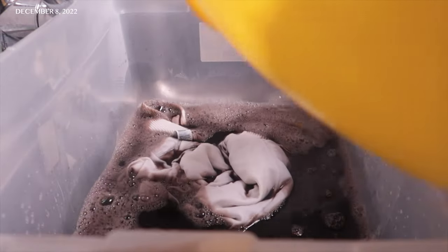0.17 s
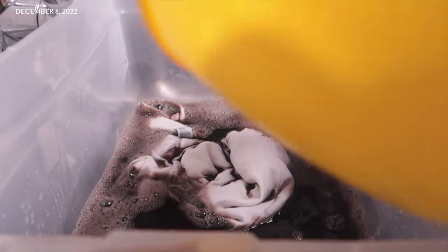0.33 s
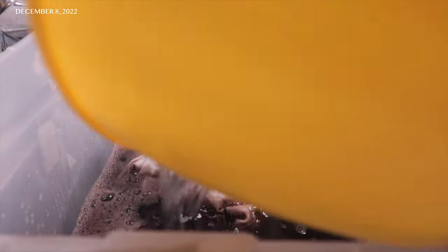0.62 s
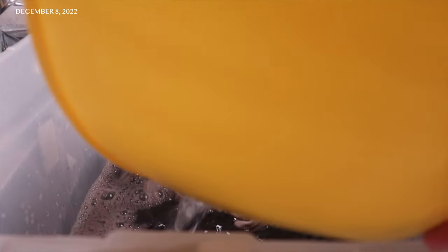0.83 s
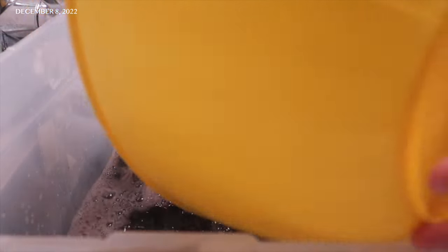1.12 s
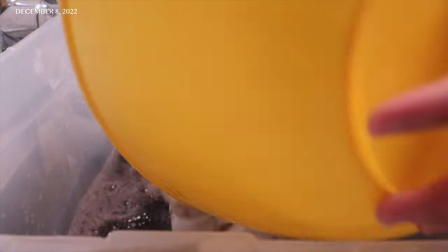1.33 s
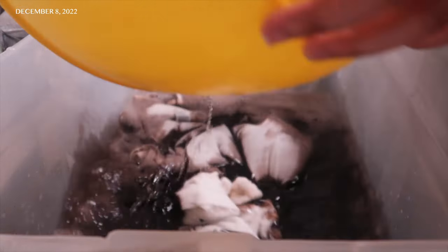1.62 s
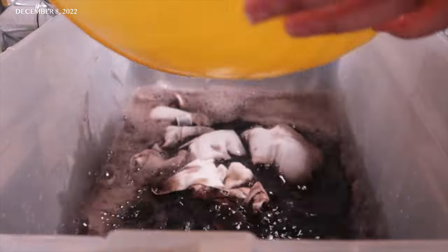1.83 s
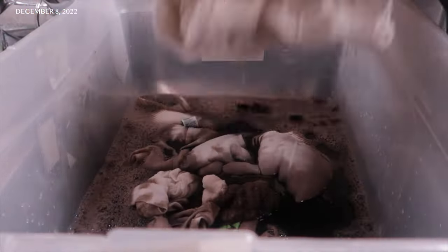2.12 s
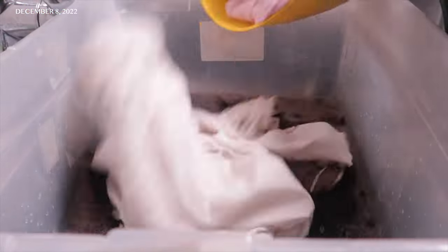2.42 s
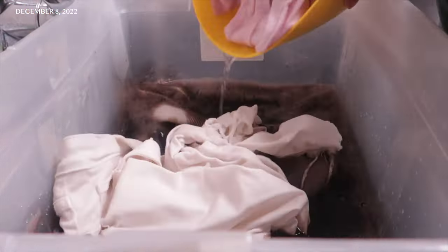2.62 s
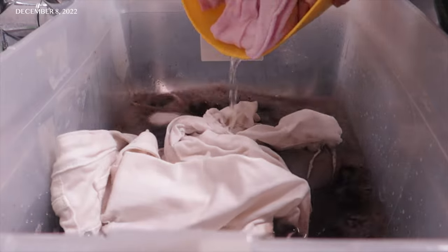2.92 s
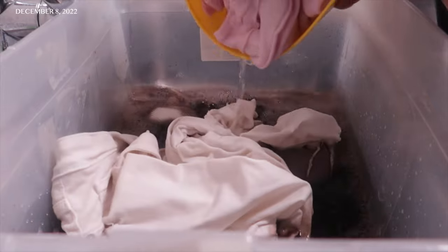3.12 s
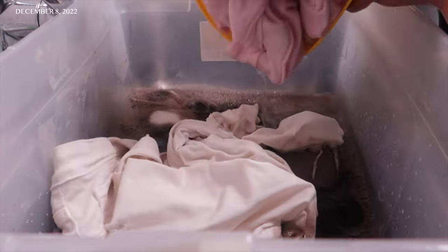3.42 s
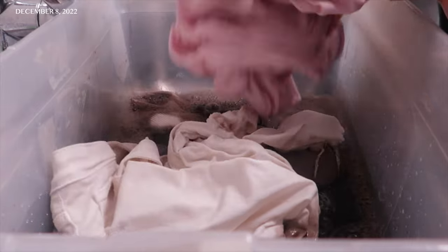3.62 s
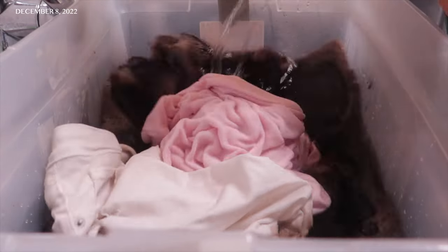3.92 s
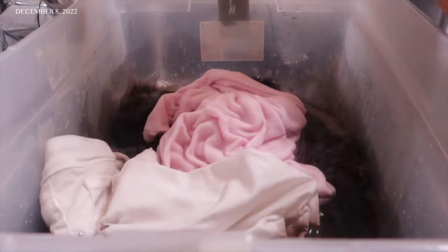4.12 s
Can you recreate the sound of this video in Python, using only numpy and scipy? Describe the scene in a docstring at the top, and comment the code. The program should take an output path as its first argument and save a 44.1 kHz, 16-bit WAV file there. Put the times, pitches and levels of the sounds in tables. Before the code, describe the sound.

Close, slightly wide stereo in a small, quiet room with faint rumble and hiss. A brief wet cloth scrape opens, and at 0.14 s a sharp hollow knock sounds as a basin hits a plastic tub. From about 0.55 s water gushes in, strongest around 0.7 to 1.0 s, with gurgling bubbles, crisp spatter and a low boom from the tub, thinning by 1.35 s. Wet flicks and surges at 1.4 to 1.5 s lead into the first load of cloth, a sharp splashing slap at 1.6 s. The basin clacks at 1.78 s, lighter at 1.88 s. After near quiet, a heavier load plunges at 2.42 s with a deep, dull gulp and thud. Soft drips and plops trickle from 2.6 to 3.4 s, then cloth slides faintly. At 3.83 s the third load smacks in loudly, and water heaves back brightly at 4.0 s, ending in small slaps and drips.

```python
"""A brief scrape of wet cloth over a basin's rim, then a sharp knock as the basin meets a plastic tub of dye water.
Water pours in, and three loads of cloth slide off and slap in, one after another, close to the listener.
Bubbles ring as masses on springs of trapped air, flung drops patter, torn water hisses and wet folds snap.
The water surges and sloshes back, stray drops fall, and struck plastic sounds its modes.
The hollow tub colours the water by resonance; a small room and its faint rumble and hiss lie around it."""
import sys
import numpy as np
from scipy import signal
from scipy.fft import rfft, irfft, next_fast_len
from scipy.io import wavfile
from scipy.ndimage import uniform_filter1d

SR = 44100
rng = np.random.default_rng(int(sys.argv[2]) if len(sys.argv) > 2 else 0)


def log_audio(samples):
    """Write samples as a 16-bit WAV file to the path given in sys.argv[1]."""
    # one column per channel
    frames = np.atleast_2d(samples).T
    # limit to full scale, then quantise
    limited = np.clip(frames, -1, 1)
    pcm = np.round(limited * 32767).astype(np.int16)
    wavfile.write(sys.argv[1], SR, pcm)


N = 188130
TIME = np.arange(N) / SR
PADDED = next_fast_len(N + 4096)
HZ = np.fft.rfftfreq(PADDED, 1 / SR)
# The stream from the basin's lip. Each row: time in seconds, strength in dB before it is shared among bubble sizes.
POUR_STRENGTH = [(0.53, -60), (0.59, -33.5), (0.70, -40), (0.83, -31.5), (0.9, -28.5), (0.98, -32),
                 (1.12, -40), (1.25, -43.5), (1.39, -55)]


def amp(db):
    """Level: decibels become an amplitude ratio."""
    return 10 ** (np.asarray(db) / 20)


def unit(x):
    """Normalization: a signal is scaled to rms 1."""
    return x / np.sqrt(np.mean(x ** 2) + 1e-20)


def read(points, hz):
    """Interpolation: a curve over frequency is read on a logarithmic frequency axis."""
    f, value = np.transpose(points)
    return np.interp(np.log(hz + 1), np.log(f), value)


def shaped(x, gain):
    """Linear filtering: each frequency is multiplied by its own gain."""
    return irfft(rfft(x, PADDED) * gain, PADDED)[:N]


def add(mix, s, sound):
    """Superposition: a sound is mixed in at time s."""
    part = mix[max(round(s * SR), 0):][:len(sound)]
    part += sound[:len(part)]


def water(hiss_db=-10):
    """Bubble resonance: swarms of four sizes ring over the hiss of torn water and sliding cloth, in the hollow tub."""
    # Crossovers between neighbouring bubble sizes, in Hz.
    crossovers = [700, 2500, 8200]
    # Spectrum of the water. Each row: frequency in Hz, relative level in dB per Hz.
    spectrum = [(30, 8), (70, -1.5), (120, 3), (200, -7.5), (370, -4), (550, -2.5), (780, -6), (1150, -9.5),
                (2000, -10.5), (3500, -16), (6500, -25), (8900, -44), (12800, -41), (15000, -65)]
    # Resonances of the air in the tub. Each row: frequency in Hz, width in Hz, boost in dB.
    hollow = [(148, 18, 6), (282, 58, 8.5), (480, 34, 6.5), (917, 21, 5), (1090, 47, 7), (1200, 240, 6.5),
              (1430, 36, 0), (1630, 68, 4), (2116, 32, 10), (2270, 24, 8), (2650, 45, 3), (2870, 50, -0.5)]
    boost = sum(db / (1 + (2 * (HZ - hz) / width) ** 2) for hz, width, db in hollow)
    colour = amp(read(spectrum, HZ) + boost)
    swarms = [froth(121.3, 737.0, per_s=380, spread_db=2.5, cycles=57.4),
              froth(642.6, 2749, per_s=1150, spread_db=3.0, cycles=90.0),
              froth(2297, 8460, per_s=2300, spread_db=1.5, cycles=71),
              froth(6340, 16060, per_s=3300, spread_db=-2.5, cycles=102)]
    below = [0] + [1 / (1 + (HZ / hz) ** 8) for hz in crossovers] + [1]
    moment = signal.windows.hann(SR // 25)
    out = np.zeros(N)
    for k, (swarm, strength) in enumerate(zip(swarms, stirring())):
        band = np.sqrt(np.maximum(below[k + 1] - below[k], 0))
        sound = swarm + amp(hiss_db) * rng.standard_normal(N)
        if k > 0:  # the deep gulps do not clump
            sound = clumped(sound)
        sound = unit(shaped(sound, colour * band))
        # the bubbles of one moment share the energy that the water has then
        shared = signal.oaconvolve(sound ** 2, moment / moment.sum(), "same")
        out += strength * sound / np.sqrt(abs(shared) + 0.27)
    return out


def stirring():
    """Energy sharing: powers of pour, loads, surges, sliding cloth and lapping add up for each size of bubble."""
    # Shares of each motion, in dB for deep gulps, splash, spatter and finest mist.
    pour_mix, load_mix = (-2.5, 0.5, -7, -22.5), (-2.5, 0, -6, -11.5)
    surge_mix, slide_mix = (3, 0.5, -7.5, -18.5), (-40, -10, 3.5, -4.5)
    # The stirred tub never comes quite to rest: strength in dB for the same four sizes.
    lapping = (-56, -60, -64.5, -68.5)
    # The dB that each size gains for one dB of brightness.
    brightens = (-0.26, 1.02, 2.5, 3)
    # Loads of wet cloth land. Each row: time in seconds, splash in dB, depth of the gulp in dB, spray in dB.
    loads = [(1.602, -23, 3, 2), (2.424, -30, 9, 3), (3.836, -22.5, 6, -0.5)]
    # Every landing is a sharp loud slap, within a softer, slower swell and a faint lingering slosh, all
    # peaking together. Each: level in dB, time constants of power for rise and fall in seconds.
    slap, slow_swell, slosh = (0, 0.0086, .014), (-11, 0.043, 0.029), (-21, .04, 0.099)
    # Water heaves and breaks against cloth and walls. Each row: peak in seconds,
    # time constants of rise and fall in seconds, level in dB, brightness in dB.
    surges = [(0.265, 0.0059, 0.015, -51.5, -0.5), (0.623, 0.0094, 0.03, -39.5, 5),
              (0.683, 0.0042, 0.026, -30.5, 3.5), (0.772, 0.018, 0.02, -28, -3.5),
              (0.864, 0.0056, 0.011, -32, 2.5), (0.94, 0.015, 0.053, -42, 8),
              (1.07, 0.0036, 0.012, -36.5, 3), (1.208, 0.0094, 0.01, -37, 0),
              (1.286, 0.016, 0.014, -42.5, 4), (1.401, 0.0045, 0.051, -37.5, 5),
              (1.437, 0.0033, 0.0072, -31.5, -1), (1.469, 0.023, 0.021, -36.5, 3),
              (1.512, 0.013, 0.014, -32, 2), (1.689, 0.01, 0.012, -41, 5), (1.88, 0.032, 0.023, -47.5, -1),
              (2.32, 0.0025, 0.034, -41.5, -4.5), (2.365, 0.005, 0.007, -37, 2.5),
              (2.405, 0.0078, 0.0046, -31.5, -8), (2.462, 0.02, 0.038, -31.5, -7),
              (2.522, 0.0025, 0.033, -38, 1), (3.888, 0.032, 0.014, -33.5, 1.5),
              (3.942, 0.011, 0.0073, -36, -2), (3.97, 0.0018, 0.0056, -30.5, 0.5),
              (4.005, 0.011, 0.021, -27, 2), (4.124, 0.0011, 0.0084, -41, 0.5),
              (4.131, 0.13, 0.022, -44.5, 0.5)]
    # Wet cloth drags over the basin's rim. Each row: peak in seconds, time constants of rise and fall
    # in seconds, level in dB.
    slides = [(0.002, 0.0035, 0.0082, -37), (0.54, 0.0012, 0.13, -46), (2.23, 0.027, 0.008, -52.5),
              (3.56, 0.091, 0.12, -53.5)]
    gulp_lag_s = 0.062  # the stream has to dig a hole before it traps large pockets of air
    streams = np.array([pouring(gulp_lag_s)] + [pouring(0)] * 3)
    power = amp(pour_mix)[:, None] ** 2 * streams
    power += np.outer(amp(lapping) ** 2, TIME > POUR_STRENGTH[0][0])
    for s, db, depth_db, spray_db in loads:
        parts = (slap, slow_swell, slosh)
        landing = sum(amp(part_db) ** 2 * swell(s, rise, fall) for part_db, rise, fall in parts)
        levels = db + np.add(load_mix, [depth_db, 0, spray_db, spray_db])
        power += np.outer(amp(levels) ** 2, landing)
    for s, rise, fall, db, bright_db in surges:
        levels = db + np.array(surge_mix) + bright_db * np.array(brightens)
        power += np.outer(amp(levels) ** 2, swell(s, rise, fall))
    for s, rise, fall, db in slides:
        power += np.outer(amp(db + np.array(slide_mix)) ** 2, swell(s, rise, fall))
    return np.sqrt(power)


def pouring(delay_s):
    """Delayed excitation: the power of the stream is felt after a lag."""
    db = np.interp(TIME - delay_s, *np.transpose(POUR_STRENGTH), left=-100, right=-100)
    return amp(db) ** 2


def swell(peak_s, rise_s, fall_s):
    """Exponential growth and decay: power builds up to a peak and dies away."""
    return np.exp(-np.maximum((peak_s - TIME) / rise_s, (TIME - peak_s) / fall_s))


def froth(lo, hi, per_s, spread_db, cycles, count=90):
    """Random superposition: a steady swarm of bubbles between two pitches, with scattered times and strengths."""
    out = np.zeros(N)
    for hz in np.geomspace(lo, hi, count) * rng.uniform(.98, 1.02, count):
        life, chirp = rng.random(2)
        place, strength = rng.random((2, 200))
        members = int(np.clip(per_s * N / SR / count, 1, len(place)))
        t60 = cycles / np.sqrt(hz * 1000) * (.5 + life)  # small bubbles ring for more cycles
        ring = np.sqrt(hz / t60) * bubble(hz, t60, 0.525 * chirp / t60, 0.43)
        sizes = amp(spread_db * np.minimum(-np.log(strength[:members]), np.pi))
        at = (place[:members, None] * N).astype(int) + np.arange(len(ring))
        out += np.bincount(at.ravel(), np.outer(sizes, ring).ravel(), N)[:N]
    return unit(out)


def bubble(hz, t60, glide, onset_cycles):
    """Volume resonance: a pocket of air closes, rings and goes sharp (glide in octaves per s) near the surface."""
    pinch_s = 0.0003  # the neck takes time to pinch shut, which rounds the start
    t = np.arange(int(t60 * SR) + 8) / SR
    turns = np.cumsum(hz * 2 ** (glide * t)) / SR
    onset = 1 - np.exp(-(turns / (onset_cycles + hz * pinch_s)) ** 2)
    return np.sin(2 * np.pi * turns) * np.exp(-np.log(1000) * t / t60) * onset


def clumped(x, patch_db=2.6, patch_s=0.009, patch_hz=650):
    """Intermittency: spray breaks up in clumps, each loud for a few milliseconds in its own range of pitch."""
    hz, t, z = signal.stft(x, SR, nperseg=256, noverlap=192)
    patches = uniform_filter1d(rng.standard_normal(z.shape), round(patch_hz / hz[1]), axis=0)
    patches = unit(uniform_filter1d(patches, round(patch_s / t[1]), axis=1))
    gain = amp(patch_db * np.clip(patches, -2, 2))
    return signal.istft(z * gain, SR, nperseg=256, noverlap=192)[1][:N]


def plops(onset_cycles=0.69):
    """Volume resonance: large bubbles and drops stand out alone, each a decaying tone that climbs in pitch."""
    # Each row: start in seconds, pitch in Hz, level in dB, t60 in seconds.
    large_bubbles = [(0.192, 1670, -34, 0.03), (0.215, 1690, -34.5, 0.036), (0.406, 338, -33, 0.035),
                     (0.549, 2060, -30.5, 0.06), (0.596, 687, -24.5, 0.041), (0.614, 1236, -33, 0.067),
                     (0.621, 479, -26.5, 0.097), (0.618, 3230, -20, 0.14), (0.69, 1706, -13, 0.034),
                     (0.693, 128, -16, 0.12), (0.702, 279, -18, 0.074), (0.724, 2067, -22, 0.06),
                     (0.758, 1120, -15, 0.037), (0.763, 910, -20.5, 0.063), (0.766, 492, -17.5, 0.058),
                     (0.772, 650, -23, 0.05), (0.778, 1180, -22.5, 0.079), (0.815, 710, -22, 0.048),
                     (0.785, 5090, -33.5, 0.098), (0.841, 1850, -24, 0.047), (0.854, 3080, -23.5, .05),
                     (0.866, 446, -21, 0.069), (0.872, 1060, -28, 0.05), (0.893, 1747, -19, 0.076),
                     (0.909, 1620, -27, .05), (0.964, 544, -21.5, 0.048), (0.989, 1650, -22, 0.048),
                     (1.005, 464, -19.5, 0.076), (1.06, 299, -21, 0.12), (1.14, 1190, -27.5, 0.043),
                     (1.147, 465, -7.5, 0.027), (1.149, 684, -18, 0.025), (1.2, 1140, -28, 0.053),
                     (1.215, 459, -30, 0.1), (1.377, 2120, -28, 0.028), (1.457, 480, -19, 0.048),
                     (1.499, 1304, -24.5, 0.054), (1.574, 284, -19.5, 0.29), (1.603, 928, -11, 0.05),
                     (1.604, 276, -16, 0.04), (1.690, 650, -27.5, 0.053), (1.922, 940, -27, 0.043),
                     (1.943, 1136, -33.5, 0.05), (2.044, 273, -36, 0.16), (2.421, 275, -7.5, 0.069),
                     (2.474, 192, -23, 0.057), (2.452, 296, -18, 0.066), (2.499, 203, -14, 0.042),
                     (2.621, 1500, -32.5, 0.022), (2.623, 320, -39, 0.071), (2.644, 360, -33, 0.067),
                     (2.722, 452, -31.5, 0.058), (2.756, 503, -36.5, 0.06), (2.774, 635, -38, 0.033),
                     (2.822, 322, -38, 0.078), (2.872, 460, -39.5, 0.05), (2.897, 310, -36, 0.072),
                     (3.103, 435, -40, 0.041), (3.126, 565, -35, 0.037), (3.169, 606, -36, 0.047),
                     (3.175, 790, -46, 0.046), (3.201, 443, -43, .05), (3.235, 296, -38, 0.047),
                     (3.367, 1090, -45, .035), (3.650, 130, -33, 0.085), (3.8, 278, -16.5, 0.07),
                     (3.823, 507.5, -12, 0.17), (3.826, 322, -14, .07), (3.97, 276, -15, 0.043),
                     (3.983, 1370, -14, 0.04), (3.997, 1080, -13.5, 0.071), (4.002, 1960, -11.5, 0.031),
                     (4.007, 2280, -16.5, 0.044), (4.011, 610, -14.5, 0.033), (4.017, 318, -14, 0.035),
                     (4.049, 4100, -30, .06), (4.114, 475, -27.5, 0.15), (4.205, 903, -29.5, 0.054),
                     (4.219, 1010, -30, 0.028), (4.251, 2300, -33.5, .025)]
    rise_octaves = 0.202  # climb within a t60: short-lived ones, near the surface, chirp fastest
    out = np.zeros(N)
    for s, hz, db, t60 in large_bubbles:
        add(out, s, amp(db) * bubble(hz, t60, rise_octaves / t60, onset_cycles))
    return out


def smacks(pops_per_s=1100, wash_db=-15, snap_db=5):
    """Impulsive radiation: wet folds clap shut with one snap, then a tight cluster of tiny bursting pockets."""
    # Sharp wet smacks and drips. Each row: start in seconds, level in dB, lowest Hz, highest Hz,
    # fade time constant in seconds.
    claps = [(0.265, -41, 870, 2000, 0.0073), (0.6234, -21.5, 1840, 4800, .007),
             (0.6316, -28, 2560, 4300, 0.0023), (0.677, -22, 1720, 4360, 0.018),
             (0.7465, -39, 383, 704, 0.0056), (0.9117, -24, 1540, 2360, 0.0084),
             (0.936, -21, 2280, 7600, 0.01), (0.981, -28, 2800, 6560, 0.0035),
             (1.067, -25, 2280, 3780, 0.0086), (1.162, -48, 9400, 14500, .008),
             (1.205, -40, 905, 2400, 0.013), (1.274, -30, 1990, 3120, 0.018),
             (1.4118, -22, 4000, 6000, 0.0051), (1.475, -20.5, 2470, 5040, 0.0036),
             (1.483, -18.5, 2480, 4760, 0.0044), (1.504, -33, 900, 1830, 0.0053),
             (1.594, -22.5, 2480, 7040, 0.0022), (1.6062, -18.5, 715, 2300, 0.0027),
             (1.618, -26, 3380, 12000, 0.008), (1.678, -30.5, 2770, 6150, 0.0028),
             (1.6881, -32, 1510, 5000, 0.0052), (2.142, -48, 5330, 12700, .005),
             (2.1783, -29, 3100, 4820, 0.0066), (2.214, -49.5, 5000, 13000, 0.0063),
             (2.361, -39, 5850, 13300, 0.027), (2.404, -28.5, 380, 1240, 0.018),
             (2.425, -26.5, 1120, 1600, 0.0068), (2.452, -22.5, 288, 550, 0.022),
             (2.520, -25, 295, 720, 0.01), (2.566, -32, 845, 1380, 0.0093), (2.842, -46, 272, 1100, 0.0072),
             (2.888, -49, 900, 1900, 0.017), (2.92, -52, 4000, 8700, .008),
             (3.127, -48.5, 700, 1400, 0.0051), (3.169, -48, 494, 1500, 0.0099),
             (3.202, -54, 3470, 6960, .01), (3.366, -44.5, 900, 1700, 0.007),
             (3.741, -38.5, 3000, 8000, 0.0094), (3.8269, -17.5, 910, 3000, 0.01),
             (3.834, -28, 1100, 6250, 0.0051), (3.862, -22, 850, 1690, .011),
             (3.887, -39, 800, 2200, 0.0034), (4.005, -26, 2400, 5800, 0.012),
             (4.024, -21, 1480, 2540, 0.0093), (4.048, -25.5, 3560, 5000, 0.0054),
             (4.1247, -22.5, 1090, 3520, 0.0096)]
    t, out = np.arange(SR // 20) / SR, np.zeros(N)
    for s, db, lo_hz, hi_hz, fade_s in claps:
        bursting = rng.random(len(t)) < pops_per_s / SR
        pops = rng.standard_normal(len(t)) * (bursting + amp(wash_db))
        pops[0] = amp(snap_db)
        band = signal.butter(3, [lo_hz, max(hi_hz, lo_hz + 100)], "bandpass", fs=SR, output="sos")
        burst = signal.sosfilt(band, pops * np.exp(-t / fade_s))
        add(out, s, amp(db) * np.sqrt(fade_s * SR / 2) * burst / np.linalg.norm(burst))
    return out


def droplets(splash_db=-10, spatter_db=-9):
    """Energy sharing: flung droplets patter in short round blips, as hard as the water is stirred."""
    _, splash, spatter, _ = stirring()
    low = froth(700, 2460, per_s=220, spread_db=3.2, cycles=36, count=45)
    high = froth(2600, 6000, per_s=320, spread_db=3, cycles=30, count=45)
    return amp(splash_db) * splash * low + amp(spatter_db) * spatter * high


def dribble(glide=6, spread_db=12):
    """Random arrivals: each stray drop traps a bubble, and the small ones ring fainter and shorter."""
    # Runs of drops off the basin and the cloth. Each row: start and end in seconds, drops per second,
    # lowest Hz, highest Hz, level of the strongest in dB.
    runs = [(0.723, 1.053, 85, 624, 3200, -28), (1.05, 1.351, 52, 525, 2660, -37),
            (1.793, 1.991, 85, 279, 1600, -36), (2.616, 2.977, 50, 341, 930, -39.5),
            (2.789, 2.964, 116, 943, 2000, -42.5), (3.058, 3.398, 57, 280, 800, -48),
            (3.194, 3.425, 104, 1030, 2200, -46), (3.849, 4.072, 49, 790, 3030, -23)]
    out = np.zeros(N)
    for start, end, per_s, lo, hi, db in runs:
        drops = rng.random((64, 3))[:int(per_s * (end - start))]
        for when, pitch, weak in drops:
            hz = lo * (hi / lo) ** pitch
            drop = bubble(hz, .06 * np.sqrt(500 / hz), glide, .6)
            level = amp(db - spread_db * weak) * np.sqrt(lo / hz)
            add(out, start + when * (end - start), level * drop)
    return out


def knocks(rows, modes, clatter_s, clatter_hz, tick_db, radiate_hz, tick_s=0.0001):
    """Modal excitation: softer pushes ring duller, with tick and clatter; thin walls radiate little bass."""
    t, out = np.arange(SR // 2) / SR, np.zeros(N)
    ring = sum(amp(db) * np.exp(-np.log(1000) * t / t60) * np.sin(2 * np.pi * hz * t) for hz, db, t60 in modes)
    for s, db, contact_s, clatter_db in rows:
        push = signal.windows.hann(int(contact_s * SR) + 3)
        noise = rng.standard_normal(len(t))
        clatter = unit(signal.lfilter(*signal.butter(2, clatter_hz, fs=SR), noise))
        clatter = clatter * np.exp(-t / (10 * clatter_s)) / (1 + t / clatter_s)
        clatter += amp(tick_db) * noise * np.exp(-t / tick_s)
        rung = np.convolve(ring, push / push.sum())[:len(t)]
        add(out, s, amp(db) * (rung + amp(clatter_db) * clatter))
    return signal.lfilter(*signal.butter(2, radiate_hz, "highpass", fs=SR), out)


def drumming(floor_hz=119, width_hz=16, level_db=-7, muffle_db_per_s=3):
    """Forced resonance: deep gulps keep a low mode of the tub's floor booming, less as cloth piles up on it."""
    ring = signal.lfilter(*signal.iirpeak(floor_hz, floor_hz / width_hz, fs=SR), rng.standard_normal(N))
    band = signal.butter(2, [floor_hz / 2, floor_hz * 2], "bandpass", fs=SR, output="sos")
    ring = signal.sosfilt(band, ring)
    push = signal.lfilter(*signal.butter(1, width_hz / 2, fs=SR), stirring()[0])  # a narrow mode answers slowly
    return amp(level_db - muffle_db_per_s * TIME) * push * unit(ring)


def puffs(top_hz=55):
    """Air displacement: the swinging basin and falling cloth push air, heard as soft low thumps."""
    # Each row: peak in seconds, time constants of rise and fall in seconds, level in dB.
    thumps = [(0.151, 0.0022, 0.024, -26.5), (0.556, 0.011, 0.018, -32.5), (1.6, 0.075, 0.049, -39.5),
              (3.87, 0.057, 0.11, -37)]
    rumble = signal.sosfilt(signal.butter(4, top_hz, fs=SR, output="sos"), rng.standard_normal(N))
    power = sum(amp(db) ** 2 * swell(s, rise, fall) for s, rise, fall, db in thumps)
    return unit(rumble) * np.sqrt(power)


def walls(x, fade_s):
    """Early reflection: sound returns in a quick, dense flurry between the tub's walls."""
    t = np.arange(SR // 20) / SR
    taps = rng.standard_normal(len(t)) * np.exp(-t / fade_s) * np.sqrt(1 - t / t[-1])
    return signal.oaconvolve(x, taps / np.linalg.norm(taps))[:N]


def room(x, delay_s=0.0086):
    """Reverberation: the small room's tail decays at each pitch's own rate, fastest in the bass and top treble."""
    # Each row: frequency in Hz, t60 in seconds.
    decay = [(100, 0.15), (260, 0.29), (700, 0.24), (1840, 0.6), (4850, 0.63), (14000, 0.15)]
    hz, t, z = signal.stft(rng.standard_normal(SR // 2), SR, nperseg=256)
    fading = np.exp(-np.log(1000) * t / read(decay, hz)[:, None])
    tail = signal.istft(z * fading, SR, nperseg=256)[1]
    return signal.oaconvolve(x, np.r_[np.zeros(int(delay_s * SR)), tail / np.linalg.norm(tail)])[:N]


def air(level_db=-51.5):
    """Stationary noise: the quiet room's rumble and hiss are random noise with a fixed spectrum."""
    # Each row: frequency in Hz, relative level in dB per Hz.
    spectrum = [(15, -64), (25, -10.5), (109, -8), (207, -14.5), (326, -15), (573, -20), (655, -18.5),
                (952, -21.5), (2370, -26.5), (13100, -45.5), (15000, -70)]
    return amp(level_db) * unit(shaped(rng.standard_normal(N), amp(read(spectrum, HZ))))


def scene(walls_db=-13, room_db=-15, knock_walls_db=-6):
    """Mid-side stereo: the tub sits in the middle, spray spreads the treble sideways, the room lies all around."""
    # Modes of the tub's plastic wall and of the basin. Each row: frequency in Hz, level in dB, t60 in seconds.
    tub_modes, basin_modes = [(81, -10, 0.2), (114, 4, 0.16), (174, -1, 0.1), (303, -6.5, 0.056),
                              (462, -10, 0.053), (626, -4.5, 0.051), (1070, 2.5, 0.091), (1175, -14, 0.25),
                              (1617, -4, 0.071), (2410, -1.5, 0.027), (3750, 6.5, 0.0065)], [(221, 0.5, 0.13), (471, -7, 0.17), (726, -8.5, 0.074),
                                           (1010, -13.5, 0.069), (1315, -9, 0.072), (1425, -12, 0.1),
                                           (1756, -13, 0.061), (2407, -8, 0.054), (2990, -7, 0.051)]
    # Blows on the tub and on the basin; wet cloth lands softly. Each row: start in seconds, level in dB,
    # contact time in seconds, clatter relative to the blow in dB.
    tub_blows, basin_blows = [(0.1398, -23, 0.00013, 4), (0.263, -42, 0.0011, -18),
                              (0.681, -24.5, 0.0023, -25), (1.455, -33, 0.0018, -30),
                              (2.412, -32, 0.0035, -30), (2.480, -28.5, 0.0045, -14)], [(1.776, -23.5, 0.00032, -7.5),
                                                  (1.875, -36.5, 0.00048, -6)]
    # Stereo spread of direct sound, then of reverberation and air. Each row: frequency in Hz, side over mid in dB.
    direct_width, room_width = [(60, -58), (200, -59), (700, -18), (1300, -20), (2400, -17), (4400, -7.5),
                                (8100, 1.5), (14000, 4.5)], [(100, -27), (220, -6), (1300, -8), (4400, -4.5), (8100, 0),
                                               (14000, 6)]
    hits = knocks(tub_blows, tub_modes, clatter_s=0.0037, clatter_hz=2170, tick_db=-3.0, radiate_hz=71)
    hits += knocks(basin_blows, basin_modes, clatter_s=0.0064, clatter_hz=1770, tick_db=-18, radiate_hz=170)
    hits = hits + amp(knock_walls_db) * walls(hits, fade_s=0.064)  # the struck walls sound into the hollow
    single = hits + plops() + smacks() + dribble() + droplets()
    dry = water() + single
    mid = dry + drumming() + puffs()
    mid += amp(walls_db) * walls(dry, fade_s=0.13) + amp(room_db) * room(dry) + air()
    # fresh random draws keep the side signal independent of the middle
    side = shaped(water() + walls(single, fade_s=0.0031), amp(read(direct_width, HZ)))
    side += shaped(amp(room_db) * room(dry) + air(), amp(read(room_width, HZ)))
    return np.array([mid + side, mid - side]) * amp([[.3], [-.3]])


def record(dry, low_cut_hz=45, edge_hz=15200):
    """Band limiting: a gentle high-pass thins the bass and a steep low-pass ends the treble."""
    lean = signal.lfilter(*signal.butter(1, low_cut_hz, "highpass", fs=SR), dry)
    return signal.oaconvolve(lean, signal.firwin(255, edge_hz, window=("kaiser", 9), fs=SR)[None], "same")


dry = scene()
out = record(dry)
log_audio(out)
```